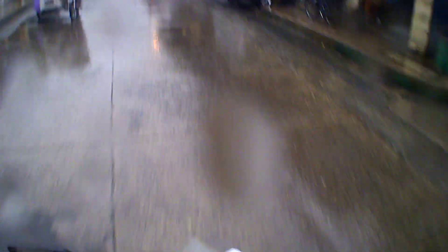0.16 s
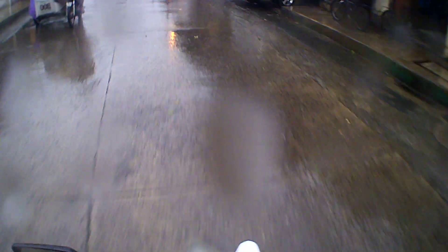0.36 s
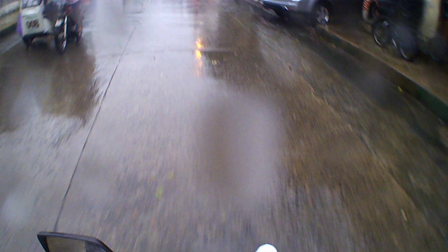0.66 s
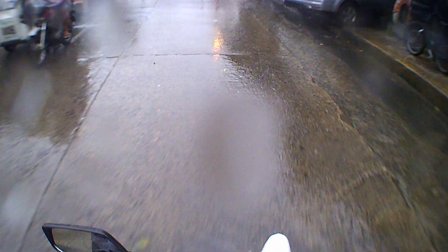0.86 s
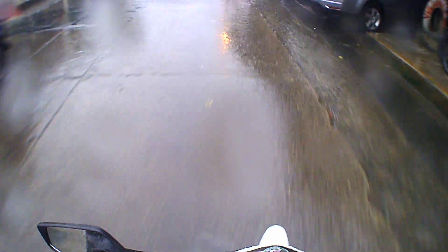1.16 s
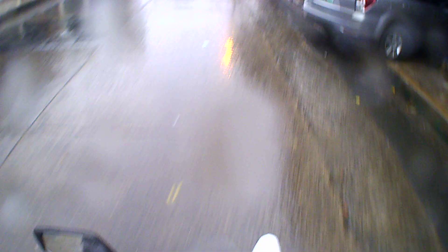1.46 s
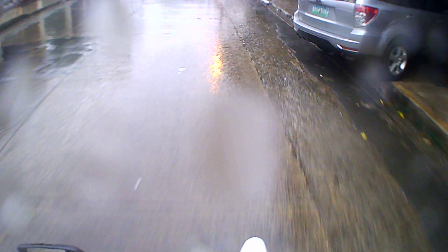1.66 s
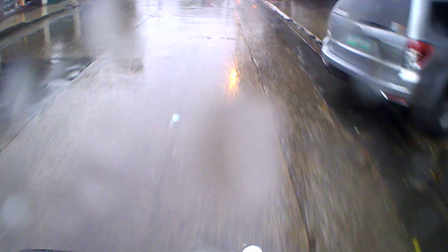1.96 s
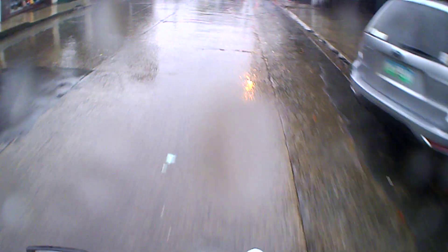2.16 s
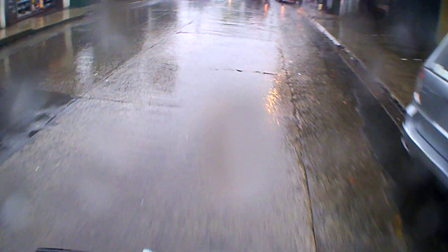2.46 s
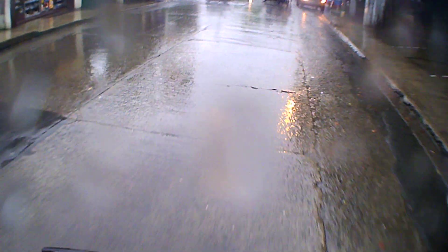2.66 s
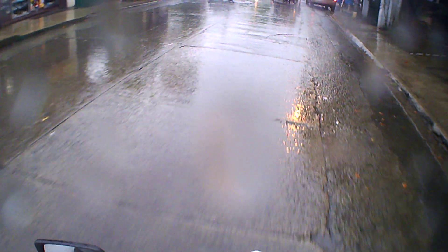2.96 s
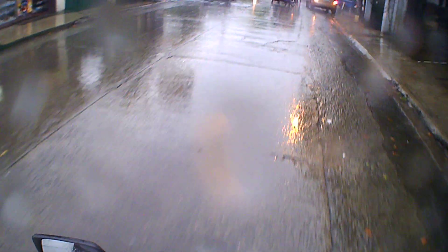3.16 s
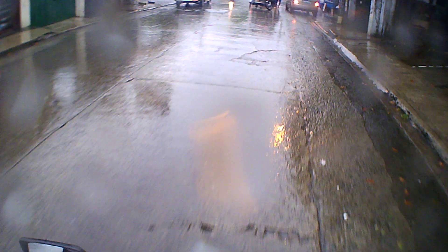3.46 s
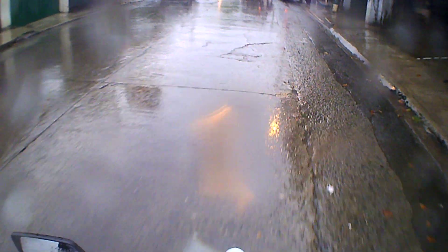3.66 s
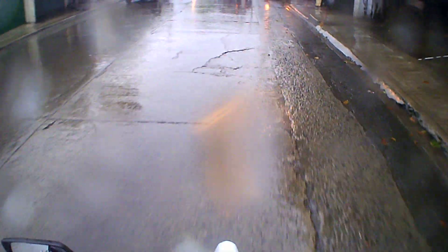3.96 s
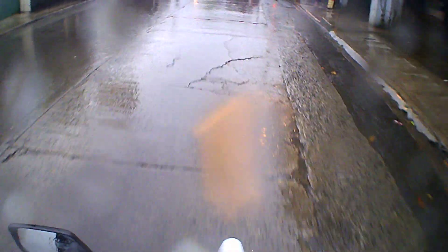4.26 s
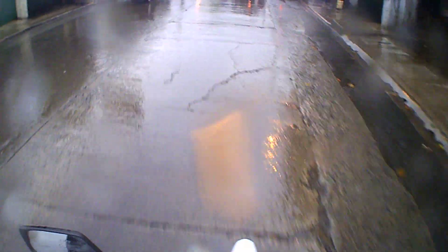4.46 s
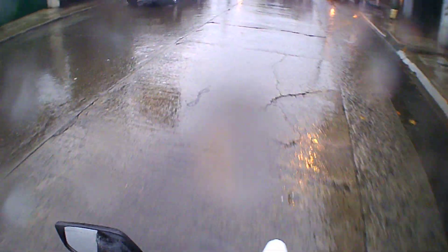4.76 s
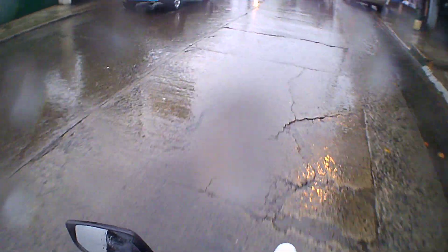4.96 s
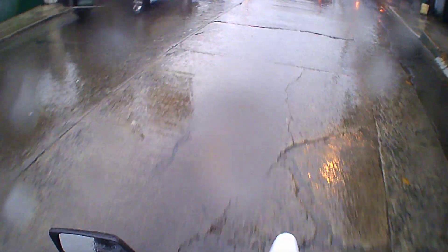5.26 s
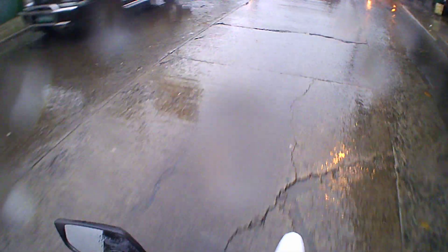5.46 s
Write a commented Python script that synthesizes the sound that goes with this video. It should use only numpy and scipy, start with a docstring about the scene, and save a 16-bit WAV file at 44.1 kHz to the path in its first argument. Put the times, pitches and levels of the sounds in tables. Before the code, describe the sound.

Raindrops tick irregularly on a small camera's plastic shell over a dull motorcycle riding rumble and faint electronic ticking.

```python
"""Raindrops tick on the sealed plastic shell of a small camera and make it ring briefly.
The camera rides on a motorcycle along a wet street, so wind and road come through as a dull rumble,
with a narrow hiss and two faint whistles. Its own electronics leak in too: bursts of ticks from
writing to the memory card, a pulse for each picture frame, a soft amplifier hiss and thin whines."""
import sys
import numpy as np
from scipy import signal
from scipy.fft import rfft, irfft, next_fast_len
from scipy.io import wavfile

SR = 44100
rng = np.random.default_rng(int(sys.argv[2]) if len(sys.argv) > 2 else 0)


def put_to_file(sound):
    """Save the sound as 16-bit audio at rate SR, in the file named by the first command-line argument."""
    columns = np.atleast_2d(sound).T  # one column per channel
    safe = np.clip(columns, -1, 1)
    whole_steps = np.round(safe * 32767)
    wavfile.write(sys.argv[1], SR, whole_steps.astype(np.int16))


N = 246959

# Big drops: t/s, relative level/dB, boost of the low notes/dB, boost of the high and top notes/dB
BIG_DROPS = [(0.0888, -48.5, -7, -22), (0.1245, -46, -4, -27), (0.415, -36, -8, -0.5),
             (0.4675, -48, -20, -25), (0.6054, -36, -15.5, -29), (0.644, -54, -0.5, -3.5),
             (0.6955, -37, -15, -11.5), (0.747, -44, -5, -15.5), (0.7661, -40, -14, -23),
             (0.839, -52, 7.5, -16), (0.9372, -46, -11, -36), (1.0098, -52, -7, -19),
             (1.0223, -30.5, -36, -11.5), (1.0955, -51, -1, -22), (1.1613, -44, -11, -23),
             (1.174, -37.5, -25, -20), (1.2164, -41, -9.5, -15.5), (1.292, -44.5, -7, -28),
             (1.3357, -39.5, -11, -14.5), (1.4643, -39, -4.5, 2.5), (1.5073, -39.5, -11, -29),
             (1.9129, -34, -10, -19), (1.9696, -50, -5, -31), (2.024, -47.5, -9, -30),
             (2.0691, -29, -8, -3.5), (2.0773, -41, -2, -3.5), (2.2108, -61.5, 5.5, -11),
             (2.2711, -47, -5, -25), (2.2812, -46.5, -18, -23), (2.4045, -39, -20, -18.5),
             (2.458, -41.5, -11, -17), (2.5783, -40, -6.5, -28), (2.5926, -47.5, -8, -28),
             (2.6095, -51, -13, -2), (2.6754, -47.5, -15, -18), (2.6999, -60, -10, 3.5),
             (2.7102, -52, -13, -25), (2.799, -55, -6, -4.5), (2.841, -48.5, -9, -26),
             (3.0225, -27, -22, -17.5), (3.2098, -33.5, -1.5, -3), (3.3728, -44, -11, -25),
             (3.425, -53.5, -5, -25), (3.4524, -33.5, -28, -19), (3.5926, -39, -11, -15.5),
             (3.8387, -46.5, -1.5, -19), (3.8969, -40.5, -12, -23), (4.4147, -36, -5.5, -39),
             (4.4407, -31.5, -15, -4.5), (4.4654, -47.5, -11, 2), (4.532, -47.5, -9, -19),
             (4.5451, -49.5, -4, 2), (4.7536, -51, -11, -17), (4.772, -51, -6, -24),
             (4.824, -39.5, -13, -32), (4.8378, -49, -2, 0), (4.8785, -45.5, -12, -21),
             (4.9221, -41, -23, -5), (5.0197, -36.5, -9.5, -22), (5.0649, -47, 8, -31),
             (5.1065, -40, -8, -20), (5.1239, -28.5, -23, -13), (5.1696, -50.5, -28, 0),
             (5.2105, -44.5, -7, -28), (5.4386, -41, -8.5, -22)]
# How strong the fine rain is: t/s, relative level/dB
FINE_RAIN = [(0.0, -64.5), (1.39, -63), (3.77, -66), (5.12, -62), (5.6, -62.5)]
# Borders between the shell's low, middle, high and top notes: f/Hz
NOTE_BORDERS = [1550, 2600, 4600]
# Small drops mostly reach the lower notes. For each of the four groups: level/dB
FINE_RAIN_REACH = [-4, -4, -10, -20]
# The notes the shell rings at: f/Hz, relative level/dB, time to fade by 60 dB/s
SHELL_NOTES = [(604, -21.5, 0.019), (1245, 2.5, 0.025), (1468, 4.5, 0.015), (1780, 4.5, 0.019),
               (1943, 1.5, 0.022), (2125, -1.5, 0.024), (2486, -3, 0.0095), (2965, 0, 0.013),
               (3295, -1.5, 0.025), (3740, 5.5, 0.0062), (4192, 0.5, 0.014), (5034, 5.5, 0.012),
               (5660, 4.5, 0.014), (6050, 7.5, 0.0062), (8230, -4.5, 0.007)]
def rain():
    """Each drop hits the shell, then pushes as it spreads; where it lands decides which notes ring."""
    times, drop_db, low_db, high_db = np.transpose(BIG_DROPS)
    reach_db = [low_db, -5.5, high_db, high_db - 14]   # low, middle, high, top
    small_drops_per_s, splash_s, splash_share = 420, 0.001, 0.45
    lands = rng.random(N) < small_drops_per_s / SR
    sizes = from_db(3.66 * np.minimum(rng.exponential(1, N), 4.5))
    small_drops = rms_one(lands * sizes + 1e-9) * from_db(curve(FINE_RAIN) - 12)
    scatter_db = 0.97 * rng.standard_normal((len(times), len(SHELL_NOTES)))
    shell = np.zeros(N)
    for k, (hz, level_db, fade_s) in enumerate(SHELL_NOTES):
        group = np.searchsorted(NOTE_BORDERS, hz)
        big = clicks(times, from_db(drop_db + reach_db[group] + scatter_db[:, k] - 9.5))
        fine = small_drops * from_db(FINE_RAIN_REACH[group] - 25.5)
        splash = fade(splash_share * big + fine, splash_s) * rng.standard_normal(N)
        blow = from_db(13.5) * (-1) ** k * big   # neighbouring notes start in opposite directions
        shell += from_db(level_db) * ring(splash + blow, hz, fade_s)
    return cut(shell, 600, "highpass")


# Tone of the wind and road: f/Hz, relative level/dB
RUMBLE_TONE = [(2.9, -67), (5.0, -1), (16, -10.5), (33, -14), (70, -26.5), (162, -31.5), (325, -45),
               (534, -46), (585, -44), (878, -54.5), (1100, -60.5), (1430, -49), (2420, -120)]
# How strong they are: t/s, relative level/dB
RUMBLE_LEVEL = [(0.0, -47.5), (3.1, -48.5), (4.21, -48), (5.24, -49), (5.6, -45)]
def wind_and_road():
    """Wind and road come through the shell as a deep, dull rumble."""
    return from_db(curve(RUMBLE_LEVEL) + 3.5) * shaped_noise(RUMBLE_TONE)


FRAME_S, FIRST_FRAME_S, WRITES_BEGIN_S = 0.04, 0.0148, 2.043
# Picture frames in which the card rests: frame number, from 0
REST_FRAMES = [52, 55, 58, 61, 65, 69, 73, 77, 81, 104, 108, 113, 117, 129, 134]
# Frames at which a new write follows right after the last one: frame number, from 0
NEW_WRITE_FRAMES = [86, 87, 89, 91, 93, 94, 97, 98, 99, 100, 101, 121, 122, 123, 124, 126, 139]
def write_spans():
    """Start and stop of each card write, in seconds; a write ends just before a listed frame."""
    rests = [(k, 0.007, k + 1) for k in REST_FRAMES]
    restarts = [(k, 0.014, k) for k in NEW_WRITE_FRAMES]
    end_frame, early_s, next_frame = np.transpose(sorted(rests + restarts))
    starts = FIRST_FRAME_S + FRAME_S * next_frame
    stops = FIRST_FRAME_S + FRAME_S * end_frame - early_s
    return zip(np.r_[WRITES_BEGIN_S, starts], np.r_[stops, N / SR])


# The repeating rhythm of ticks in a write: gap/s
TICK_GAPS = [.0056, .00775, .00744, .0056]
# How far each gap may stray either way: t/s
GAP_WOBBLE = [.001, 0, 0, .001]
# Tone of a write tick: f/Hz, width/Hz, relative level/dB
WRITE_BANDS = [(7450, 1100, -4), (8800, 540, -3), (9300, 600, -6.5), (10960, 1400, -7), (14200, 1800, -8)]
def card_writes():
    """Writing draws quick spikes of current, each with a small tick before and a faint flutter after."""
    times = []
    for start, stop in write_spans():
        gaps = np.resize(TICK_GAPS, 30) + np.resize(GAP_WOBBLE, 30) * rng.uniform(-1, 1, 30)
        beats = start + np.cumsum(np.r_[0, gaps])
        times += list(beats[beats < stop - 0.003]) + [stop]
    times = np.array(times)
    spikes = clicks(times, from_db(-32.5 + 2.3 * rng.standard_normal(len(times))))
    clean_ticks = sum((-1) ** k * from_db(db) * band(spikes, hz, width_hz)
                      for k, (hz, width_hz, db) in enumerate(WRITE_BANDS))
    before = noisy_ticks(times - 0.0007, from_db(-59), WRITE_BANDS, length_s=0.00073)
    flutter = noisy_ticks(times + 0.0018, from_db(-60), WRITE_BANDS, length_s=0.0069)
    return clean_ticks + before + flutter


# Tone of a frame tick: f/Hz, width/Hz, relative level/dB
FRAME_BANDS = [(11200, 1700, -8), (14100, 2300, -5.5), (7850, 4700, -11.5)]
def frame_pulses():
    """For each picture the chip wakes, works in blocks and stops; every step jolts its power supply."""
    wakes = np.arange(FIRST_FRAME_S, N / SR, FRAME_S)
    chance = rng.random((len(wakes), 2))
    stops = wakes + 0.0195 + 0.0045 * chance[:, 0]
    first_blocks = wakes + 0.002 + 0.006 * chance[:, 1]
    blocks = first_blocks[:, None] + 0.0077 * np.arange(3)
    blocks = blocks[blocks < stops[:, None]]
    supply = supply_jolts(wakes, -from_db(-44), settle_s=0.0015)
    supply += supply_jolts(stops, -from_db(-73), settle_s=0.00086)
    supply += supply_jolts(blocks, from_db(-53), settle_s=0.0011)
    ticks = noisy_ticks(wakes, from_db(-48), FRAME_BANDS, length_s=0.00088)
    ticks += noisy_ticks(stops, from_db(-49), FRAME_BANDS, length_s=0.0014)
    ticks += noisy_ticks(blocks, from_db(-49.5), FRAME_BANDS, length_s=0.00069)
    before_writes = np.arange(N) < WRITES_BEGIN_S * SR
    return supply + before_writes * ticks


def noisy_ticks(times, size, bands, length_s):
    """Spikes of current, each heard as a tiny burst of noise in the given bands."""
    swell = np.hanning(round(length_s * SR) + 3)
    bursts = np.convolve(clicks(times, size), swell, "same") * rng.choice([-1, 1], N)
    return sum(from_db(db) * band(bursts, hz, width_hz) for hz, width_hz, db in bands)


def supply_jolts(times, size, settle_s):
    """The power supply dips or jumps when its load changes, then creeps back."""
    return cut(fade(clicks(times, size), settle_s), 900, "lowpass")


# Tone of the amplifier's noise: f/Hz, relative level/dB
AMPLIFIER_TONE = [(530, -14), (900, -8), (1810, -5), (2620, -10.5), (4080, -13), (4660, -15), (8390, -20.5),
                  (14400, -19), (15800, -25)]
def amplifier_noise():
    """The amplifier adds a soft, steady hiss."""
    return from_db(-66.5) * shaped_noise(AMPLIFIER_TONE)


# How loud the narrow hiss is: t/s, level/dB
HISS_LEVEL = [(0, -90), (.77, -79), (.8, -59), (.87, -65.5), (.97, -76.5), (2.5, -77), (4.1, -77.5),
              (4.35, -74.5), (5.6, -69.5)]
def narrow_hiss(centre_hz=4160):
    """Slow noise shifted up to a high pitch; it swells once early on and grows toward the end."""
    slow = cut(rng.standard_normal((2, N)), 110, "lowpass")
    phase = 2 * np.pi * centre_hz * np.arange(N) / SR
    hiss = slow[0] * np.cos(phase) + slow[1] * np.sin(phase)
    return from_db(curve(HISS_LEVEL)) * rms_one(hiss)


# Tones from the electronics: f/Hz, level/dB
WHINE_TONES = [(575, -76), (600, -78), (550, -86), (12900, -96), (13250, -90)]
def whines():
    """The electronics leak thin, steady tones."""
    t = np.arange(N) / SR
    return sum(from_db(db) * np.sqrt(2) * np.sin(2 * np.pi * hz * t) for hz, db in WHINE_TONES)


# Whistles from the street: start t/s, length/s, first f/Hz, last f/Hz, relative level/dB
STREET_WHISTLES = [(0.7, 0.11, 4560, 4560, -76), (1.495, 0.145, 1067, 1143, -72)]
def whistles():
    """Two faint whistles fade in and out; one holds its pitch, the other slides up."""
    sound = np.zeros(N)
    for start, length, first_hz, last_hz, db in STREET_WHISTLES:
        progress = np.clip((np.arange(N) / SR - start) / length, 0, 1)
        phase = 2 * np.pi * np.cumsum(first_hz + (last_hz - first_hz) * progress) / SR
        swell = 2 * np.sqrt(np.sin(np.pi * progress).clip(0))
        sound += from_db(db) * swell * np.sin(phase)
    return sound


def from_db(db):
    """Turn decibels into a number to multiply by."""
    return 10 ** (np.asarray(db) / 20)


def rms_one(x):
    """Scale a sound so its average strength (rms) is 1."""
    return x / np.sqrt(np.mean(x ** 2) + 1e-20)


def curve(rows):
    """Join (time, value) points with straight lines, one value a sample."""
    return np.interp(np.arange(N) / SR, *np.transpose(rows))


def shaped_noise(tone):
    """Noise of strength 1 whose lows and highs follow a tone table."""
    size = next_fast_len(N)
    hz, level_db = np.transpose(tone)
    grid_hz = np.maximum(np.arange(size // 2 + 1) * SR / size, 1)
    gains = from_db(np.interp(np.log(grid_hz), np.log(hz), level_db))
    return rms_one(irfft(rfft(rng.standard_normal(size)) * gains, size)[:N])


def clicks(times, sizes):
    """One-sample clicks at the given seconds."""
    track = np.full(N, 1e-18)
    at = (np.asarray(times) * SR).astype(int)
    np.add.at(track, at[at < N], (sizes * np.ones(len(at)))[at < N])
    return track


def ring(x, hz, fade_s):
    """Each click starts a pure note that falls by 60 dB in fade_s."""
    decay, step = from_db(-60 / (fade_s * SR)), 2 * np.pi * hz / SR
    return signal.lfilter([0, np.sin(step)], [1, -2 * decay * np.cos(step), decay ** 2], x)


def band(x, hz, width_hz):
    """Keep the part of a sound near one pitch."""
    decay = np.exp(-np.pi * width_hz / SR)
    feedback = [1, -2 * decay * np.cos(2 * np.pi * hz / SR), decay ** 2]
    return signal.lfilter(np.array([1, 0, -1]) * (1 - decay ** 2) / 2, feedback, x)


def fade(x, seconds):
    """Give each click a tail that dies away."""
    return signal.lfilter([1], [1, -np.exp(-1 / (seconds * SR))], x)


def cut(x, hz, kind):
    """Gently keep what is below hz ("lowpass") or above it ("highpass")."""
    return signal.sosfilt(signal.butter(2, hz, kind, fs=SR, output="sos"), x)


def scene():
    """The outside sounds and the camera's electronics, added into one channel."""
    outside = rain() + wind_and_road() + narrow_hiss() + whistles()
    electronics = card_writes() + frame_pulses() + amplifier_noise() + whines()
    return (outside + electronics)[None]


def record(dry):
    """The camera cuts the highest treble, and its converter shifts the wave a little below zero."""
    cutoff_hz, offset = 16050, -0.0247
    return signal.sosfilt(signal.cheby2(20, 50, cutoff_hz, fs=SR, output="sos"), dry) + offset


dry = scene()
out = record(dry)
put_to_file(out)
```